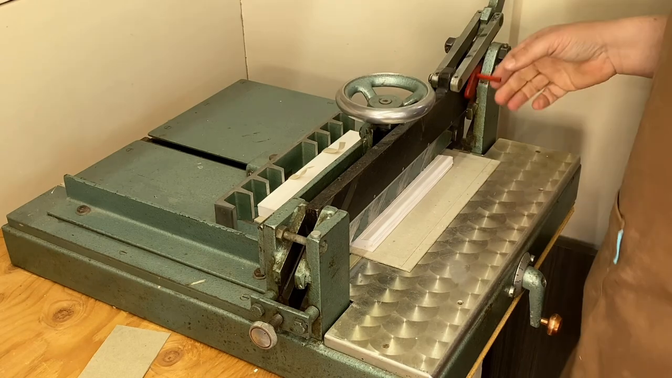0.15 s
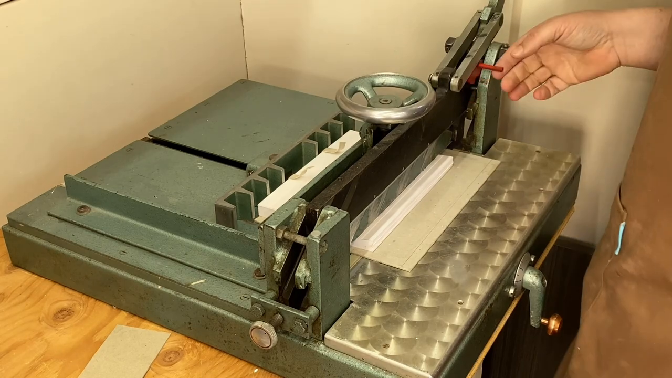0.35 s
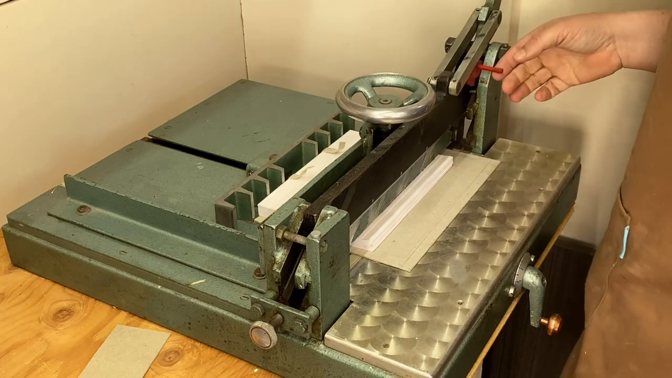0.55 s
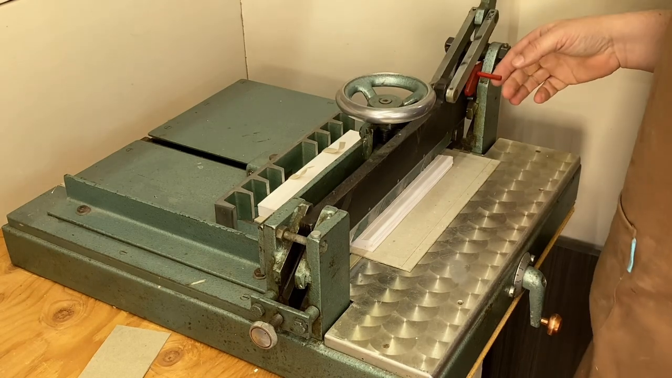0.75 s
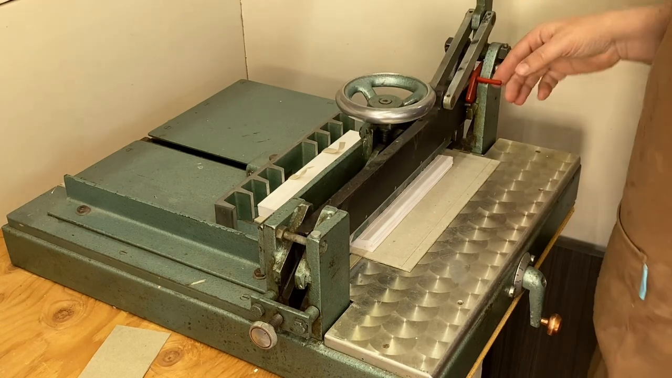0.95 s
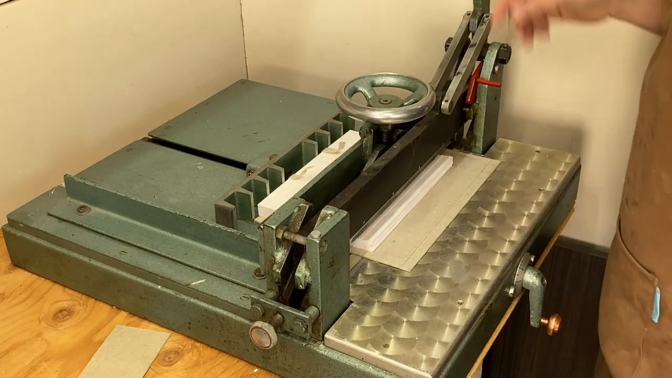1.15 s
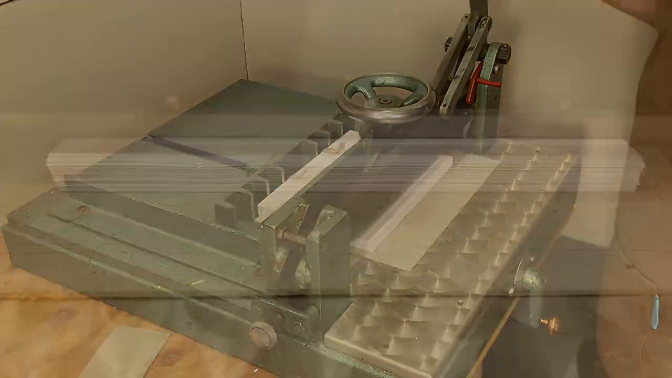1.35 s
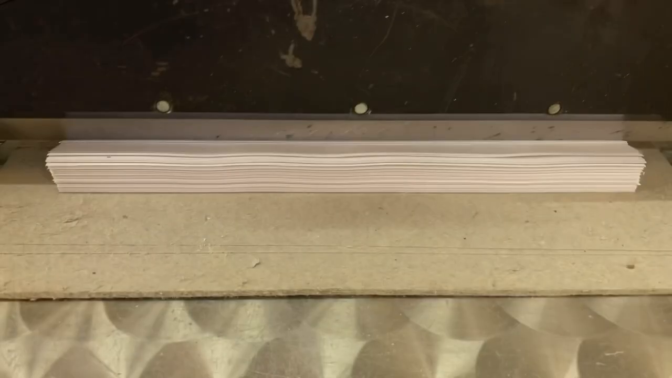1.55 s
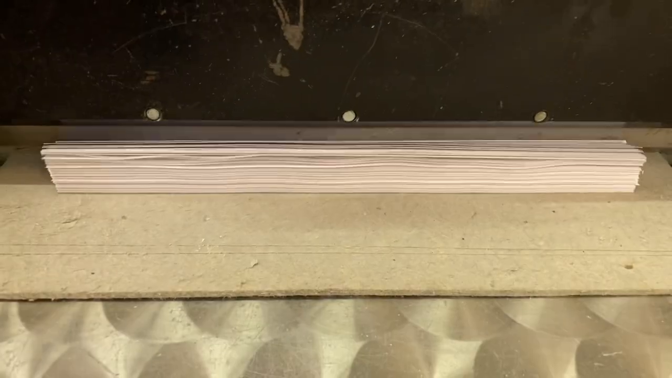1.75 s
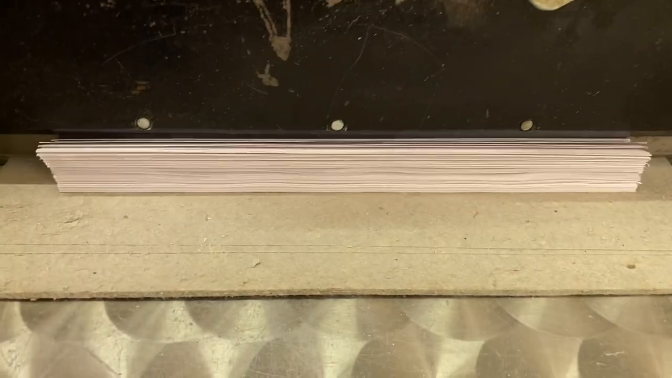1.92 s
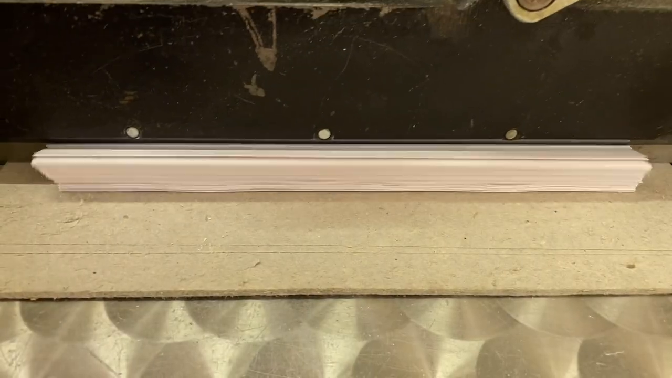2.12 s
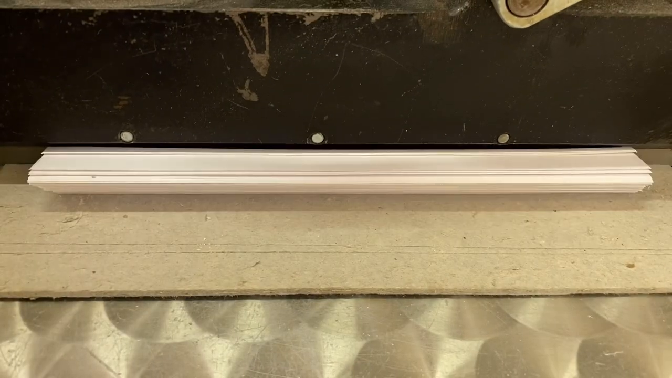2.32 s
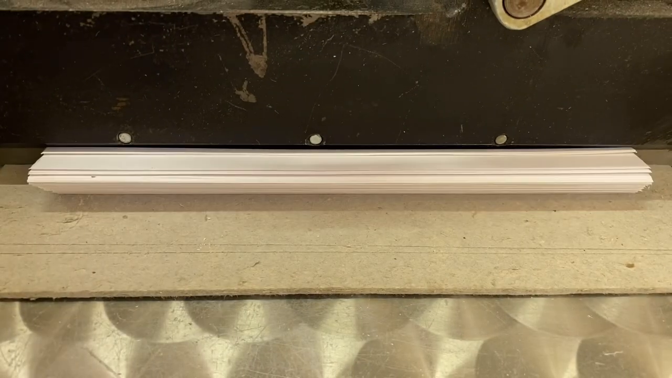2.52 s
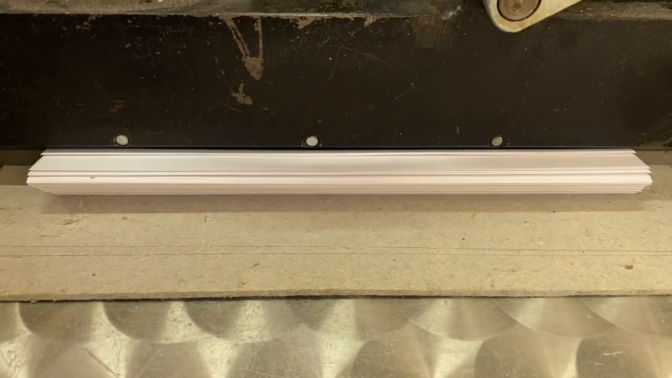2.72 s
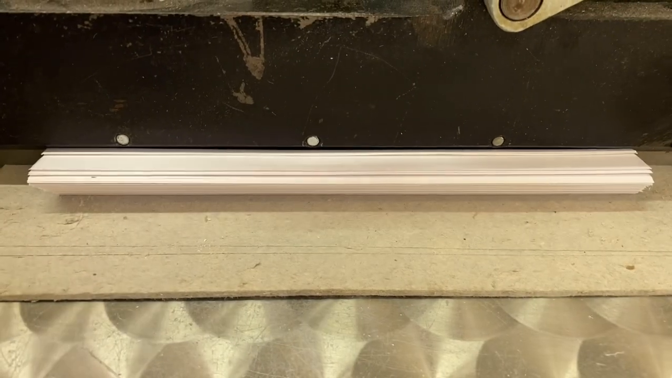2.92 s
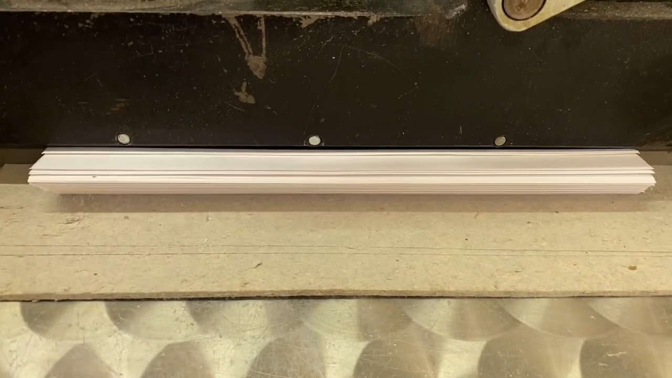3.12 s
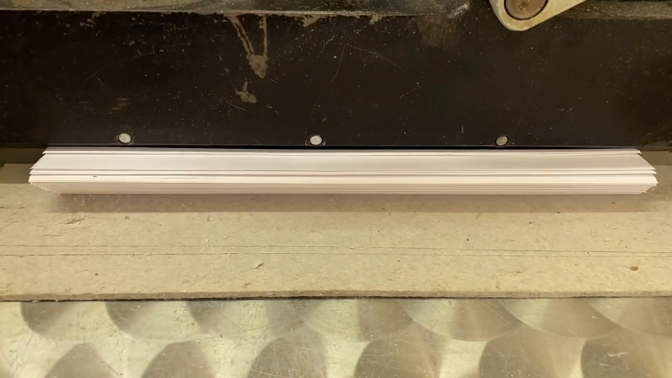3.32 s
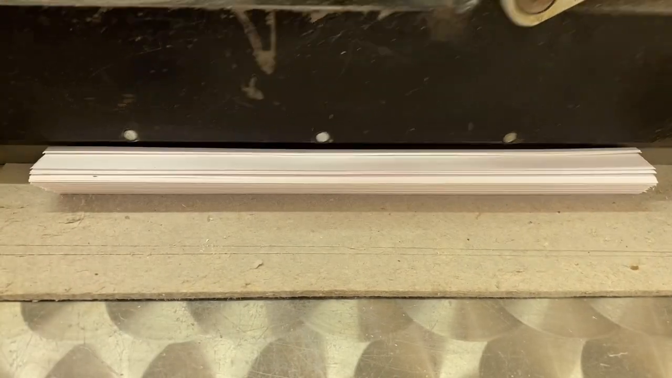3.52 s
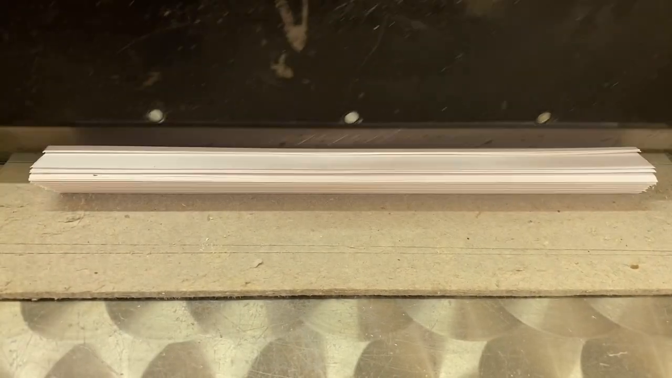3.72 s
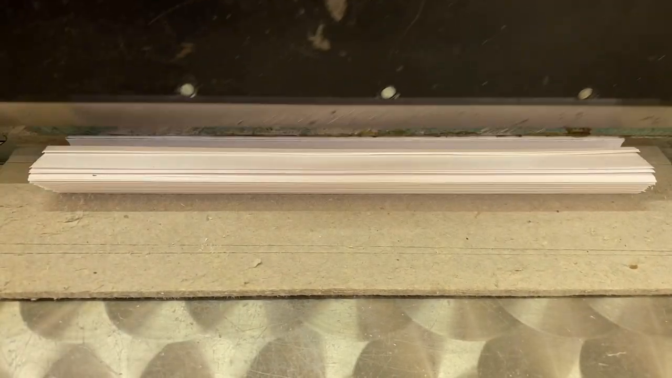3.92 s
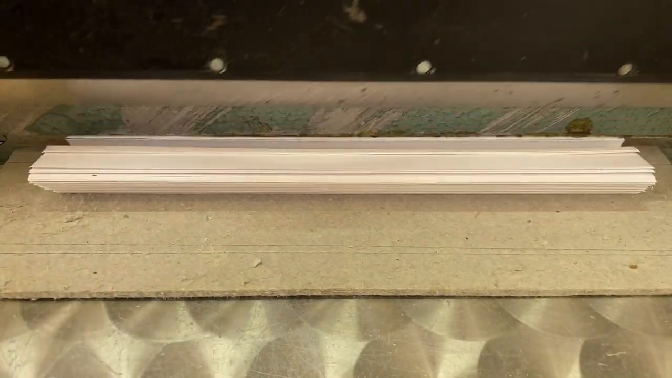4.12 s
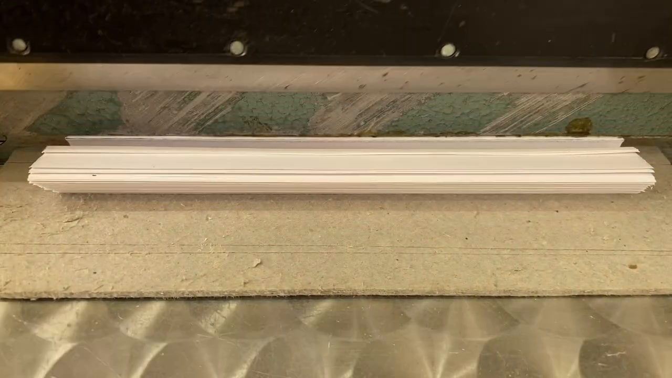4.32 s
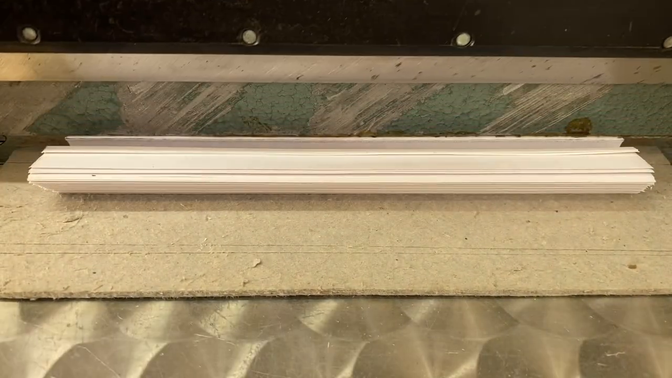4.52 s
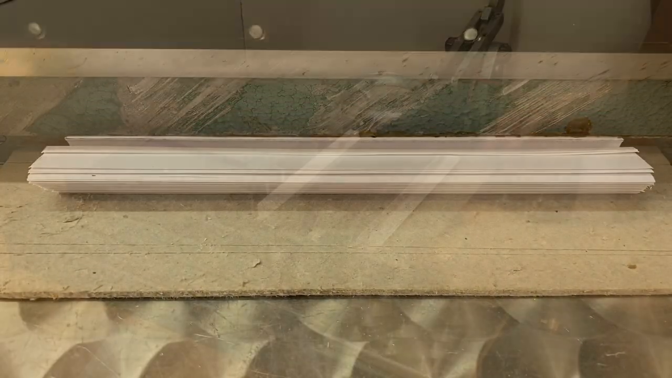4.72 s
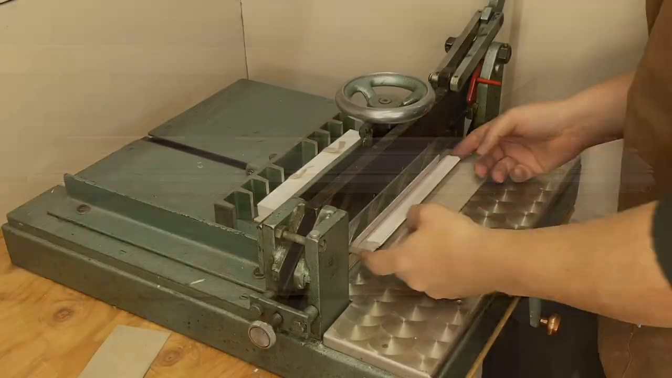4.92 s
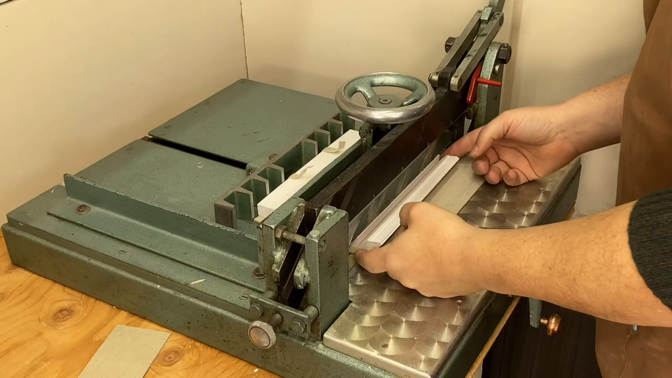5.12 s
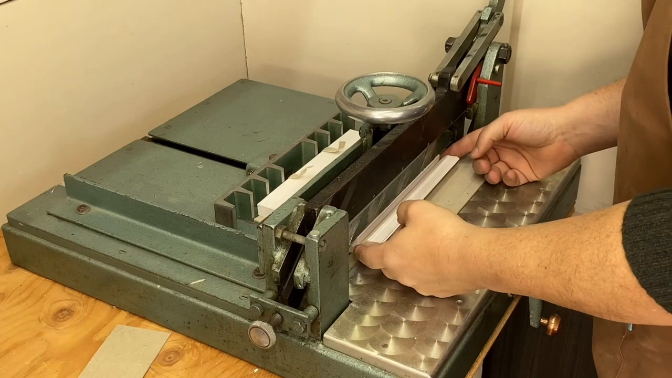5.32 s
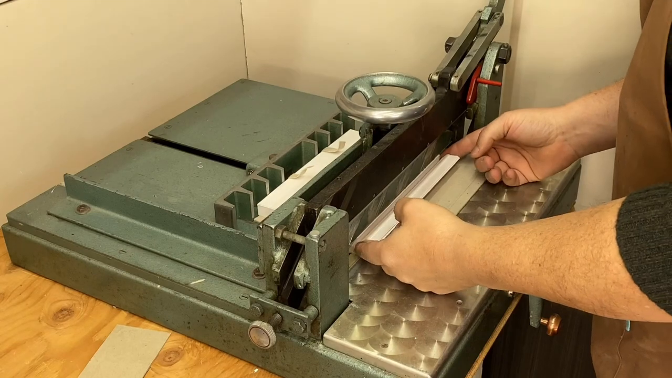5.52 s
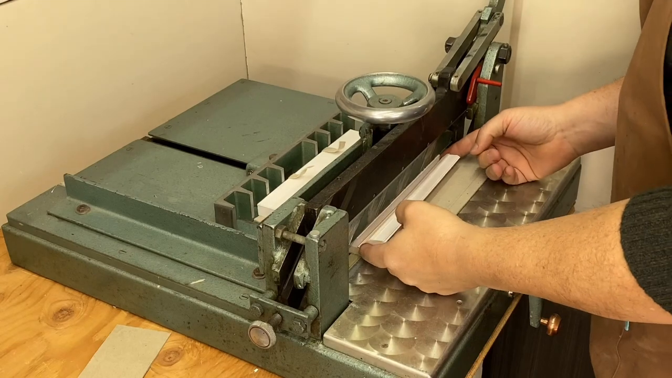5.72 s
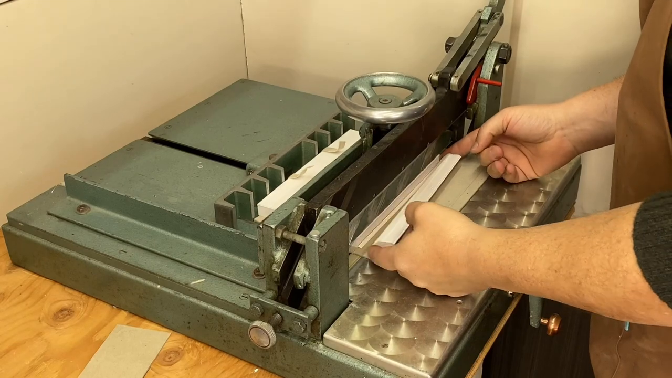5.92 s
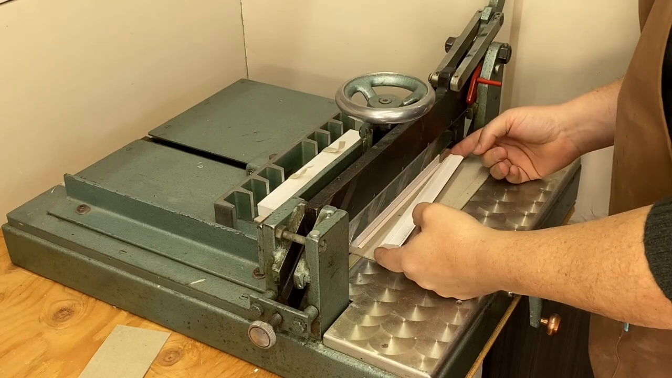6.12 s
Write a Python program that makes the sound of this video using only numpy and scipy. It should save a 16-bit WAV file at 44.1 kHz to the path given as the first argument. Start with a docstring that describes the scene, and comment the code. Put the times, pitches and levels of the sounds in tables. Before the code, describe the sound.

Metal lever knocks, a short groaning crunch of a blade cutting stacked paper, then sharp iron clunks in a small workshop.

```python
"""Cast-iron guillotine cutting a paper stack in a small workshop.
Catch and linkage knock, the carrier rubs in its guides, sheets part in turn with a groan and crunch.
The blade lands, rings and squeaks in the cutting stick; the lever hits its stop, the catch snaps shut,
hands slide the paper out. Blows ring the iron frame; the bench sways and shudders under the load."""
import sys
import numpy as np
from scipy import signal
from scipy.fft import rfft, irfft, next_fast_len
from scipy.io import wavfile
from scipy.ndimage import uniform_filter1d

SR = 44100
rng = np.random.default_rng(int(sys.argv[2]) if len(sys.argv) > 2 else 0)


def file_out(sig):
    """Save sig as 16-bit WAV at sys.argv[1]."""
    # one column per channel
    cols = np.atleast_2d(sig).T
    # limit, then scale
    lim = np.clip(cols, -1, 1)
    pcm = np.round(lim * 32767).astype(np.int16)
    wavfile.write(sys.argv[1], SR, pcm)


N = 271656
TIME_S = np.arange(N) / SR

# Workshop air spectrum: freq_hz, density_db
AIR_SPECTRUM = [(60, 15.5), (200, -7), (315, -0.5), (430, -4), (900, -10.5), (3300, -19.5), (7200, -22),
                (16000, -28)]
# Workshop decay: freq_hz, t60_s
ROOM_DECAY = [(100, 0.15), (400, 0.17), (1500, 0.2), (6500, 0.25), (15000, 0.22)]
# Load of lever and hands on the bench: time_s, level_db
BENCH_LOAD = [(0, -24.5), (.38, -14.5), (.65, -23.5), (1.1, -24), (1.38, -10.5), (1.53, -4), (1.8, -4),
              (2.03, 4), (2.28, -4), (2.41, -14.5), (2.76, 0.5), (2.95, -9), (3.3, -4.5), (3.72, 0.5),
              (4.05, -8.5), (4.3, -17), (5.1, -28.5), (6.15, -32.5)]
# Bench top spectrum: freq_hz, density_db
SHUDDER_SPECTRUM = [(32, 3), (48, -10), (70, -17.5), (119, -13), (200, -25), (260, -25.5), (400, -36.5),
                    (900, -67)]
# Catch, linkage and carrier knocks: start_s, contact_s, decay_s, level_db, thud_db, ring_hz, top_hz
JOINT_KNOCKS = [(0.033, 0.0004, 0.0011, -45.5, -2, 1450, 8200),
                (0.174, 0.0014, 0.0069, -47.5, 0, 3020, 4050),
                (0.205, 0.0017, 0.0014, -38.5, 1, 1950, 4120), (0.315, .003, 0.0073, -25, 20.5, 316, 4730),
                (0.638, .0043, 0.013, -48, -14, 905, 5000), (0.648, 0.0012, 0.005, -28, 9, 590, 6300),
                (0.919, 0.0031, 0.0039, -55, 6, 560, 1200), (0.992, 0.011, .013, -28.5, -8, 11300, 8000),
                (1.15, 0.0038, 0.0075, -40.5, 21, 560, 2210), (1.337, 0.0042, 0.0056, -31, 24.5, 120, 4000),
                (1.349, 0.0052, 0.0075, -24.5, 17.5, 1100, 6350),
                (1.352, .003, 0.011, -39, -23, 6000, 6200), (3.078, 0.0013, 0.0064, -25.5, 16.5, 120, 4660),
                (3.148, 0.00064, 0.0036, -39, 8.5, 120, 4360),
                (3.482, 0.0029, 0.0046, -32.5, 9.5, 200, 5800), (3.497, .001, .004, -34, -4, 5000, 11000),
                (3.724, 0.004, 0.0062, -37, 16.5, 520, 7000), (3.985, 0.0021, 0.0046, -41, -4, 3320, 6400),
                (4.085, 0.0067, .008, -48, 2, 276, 6000), (4.677, 0.0041, 0.0054, -47.5, -2, 400, 1220),
                (4.698, 0.0037, 0.011, -29, -14, 131, 14400)]
# Iron on iron: freq_hz, density_db
KNOCK_SPECTRUM = [(100, 1.5), (300, 0.5), (800, -7.5), (2000, -10), (6000, -15), (16000, -23)]
# Iron frame modes, relative to the blow's spectrum: freq_hz, gain_db, t60_s
IRON_MODES = [(124, 8.5, .2), (246.5, .5, .2), (279, 0, .1), (370, .5, .1), (419, 1, .075), (484, 4, .18),
              (684, -.5, .2), (810, 3, .14), (1094, -4.5, .14), (1238, 4, .11), (1500, 9, .075),
              (1730, -11, .2), (2133, -5.5, .17), (3963, -8, .14)]
# Carrier rub, downstroke: time_s, level_db
RUB_DOWN = [(1.4, -57.5), (2.15, -50.5), (2.39, -62), (2.56, -54.5), (2.68, -45), (2.86, -59.5), (3.2, -62)]
# Carrier rub, upstroke: time_s, level_db
RUB_UP = [(3.2, -65), (3.36, -52), (3.62, -48.5), (3.82, -56), (4.12, -54.5), (4.25, -65.5), (4.66, -68)]
# Guide friction: freq_hz, density_db
RUB_SPECTRUM = [(240, -54), (400, -5), (562, -10), (865, -7), (1820, -11), (2090, -11.5), (2320, -12),
                (7510, -18.5), (16000, -31)]
# Force on the edge: time_s, level_db
EDGE_FORCE = [(1.45, -26), (1.495, -7.5), (1.54, -13), (1.575, -5.5), (1.63, -7), (1.665, 2.5),
              (1.71, -0.5), (1.765, 2.5), (1.91, -1.5), (1.99, 0), (2.06, -3.5), (2.145, -5.5),
              (2.21, -24.5), (2.32, -29)]
# Cutting speed: time_s, sheets_per_s
CUT_RATE = [(1.47, 228), (1.52, 240), (1.575, 305), (1.61, 121), (1.69, 170), (1.76, 296), (1.87, 252),
            (1.93, 194), (2.2, 150)]
# Stack groan: freq_hz, density_db
GROAN_SPECTRUM = [(100, 10), (134, 10), (284, 4.5), (393, 3), (489, -14.5), (600, -11), (700, -44)]
# Paper fractures: freq_hz, density_db
CRUNCH_SPECTRUM = [(480, 8), (595, -11.5), (810, -7.5), (1140, -19), (1480, -18.5), (1740, -21.5),
                   (3000, -28.5)]
# Tearing fibres: freq_hz, density_db
FIBRE_SPECTRUM = [(2400, 4), (3000, -4), (5000, -5.5), (8400, -10), (11000, -16), (14800, -11),
                  (16000, -16)]
# Paper snapping under the edge and as strips fan out: start_s, level_db, decay_s
PAPER_SNAPS = [(1.472, -48.5, 0.003), (1.646, -37, 0.036), (1.788, -39.5, 0.0022), (1.82, -40, 0.0024),
               (1.934, -39, 0.0018), (2.117, -47, .003), (2.32, -50, 0.0085), (2.425, -55, 0.0033),
               (2.815, -53, 0.0022)]
# Snapping or sliding paper: freq_hz, density_db
PAPER_SPECTRUM = [(450, -3.5), (800, -5.5), (1100, -8.5), (1400, -9.5), (1800, -14.5), (4200, -16.5),
                  (8000, -22), (16000, -32.5)]
# Blade hitting the stick: freq_hz, density_db
LANDING_SPECTRUM = [(70, 10), (150, -2.5), (200, -11), (360, -6.5), (560, -23.5), (860, -11), (1100, -16),
                    (1510, -16), (3190, -21), (3910, -31), (4600, -22.5), (6500, -26), (8470, -48),
                    (9700, -46), (16000, -55)]
# Blade modes: freq_hz, level_db, t60_s
BLADE_RING = [(836, -25.5, 0.11), (1830, -60, 0.098), (3580, -33, 0.15), (3840, -54, 0.23),
              (3840, -33.5, 0.23), (3960, -30.5, .17), (4140, -31, 0.12), (4170, -42, 0.31),
              (6700, -42, 0.11), (9350, -58, 0.13), (9520, -60, 0.069), (9640, -49, 0.22),
              (9300, -32, 0.17), (13200, -51, 0.11)]
# Resonances of the edge in the stick: freq_hz, width_hz, level_db
SQUEAK_PEAKS = [(410, 194, 5.5), (1183, 60, 2.5), (1250, 26, -5), (1930, 64, -13), (5000, 640, -9.5)]
# Lever hitting its stop: freq_hz, density_db
STOP_SPECTRUM = [(80, -18), (122, -2), (170, -8), (250, -8), (420, -10), (620, -22.5), (800, -14.5),
                 (1550, -18.5), (2100, -21.5), (3900, -24), (4700, -29), (9500, -29.5), (12500, -50),
                 (16000, -43)]
# Catch shutting: freq_hz, density_db
CATCH_SPECTRUM = [(70, -0.5), (105, -17), (180, -22), (350, -16.5), (750, -27), (2600, -25), (3200, -55),
                  (3900, -56), (4800, -25), (8000, -30.5), (10000, -60), (12000, -34.5), (16000, -41)]
# Paper pushed over the table: start_s, attack_s, hold_s, level_db
PAPER_PUSHES = [(5.138, 0.008, 0.026, -50), (5.23, 0.013, 0.011, -53.5), (5.734, 0.14, 0.21, -58.5)]

CUTOFF_HZ = 16100


def from_db(db):
    """Decibels to gain."""
    return 10 ** (np.asarray(db) / 20)


def unit_rms(x):
    """Scale to rms 1."""
    return x / np.sqrt(np.mean(x ** 2) + 1e-20)


def curve(points, outside=None):
    """Table value at every sample."""
    return np.interp(TIME_S, *np.transpose(points), outside, outside)


def at_hz(points, hz):
    """Table value on a log-frequency axis."""
    freq_hz, value = np.transpose(points)
    return np.interp(np.log(np.maximum(hz, 1)), np.log(freq_hz), value)


def lowpass(x, hz):
    """Second-order low-pass."""
    return signal.sosfilt(signal.butter(2, hz, fs=SR, output="sos"), x)


def drift(rate_hz):
    """Smooth random wander, rms 1."""
    return unit_rms(lowpass(rng.standard_normal(N + SR), rate_hz)[SR:])


def coloured(x, spectrum):
    """Apply a spectrum, steep past its ends; rms 1."""
    size = next_fast_len(N)
    hz = np.maximum(np.arange(size // 2 + 1) * SR / size, 1)
    skirts = 1 / (1 + (spectrum[0][0] / hz) ** 8 + (hz / spectrum[-1][0]) ** 8)
    return unit_rms(irfft(rfft(x, size) * from_db(at_hz(spectrum, hz)) * skirts, size)[:N])


def grains(per_s, spread_db):
    """Random impulses of uneven size."""
    sizes = from_db(spread_db * np.minimum(rng.exponential(1, N), 4)) * rng.choice([-1, 1], N)
    return sizes * (rng.random(N) < per_s / SR)


def levelled(x, window_s):
    """Hold short-time rms at 1."""
    return x / np.sqrt(np.abs(uniform_filter1d(x ** 2, int(window_s * SR))) + 1e-9)


def swell(start_s, attack_s, hold_s, release_s):
    """Envelope: full at start_s, holds, decays."""
    before_s, after_s = np.maximum(start_s - TIME_S, 0), np.maximum(TIME_S - start_s - hold_s, 0)
    return np.exp(-before_s / (attack_s + 1e-4) - after_s / (release_s + 1e-4))


def resonance(x, hz, width_hz):
    """Steep-sided peak, rms 1."""
    for span_hz in (width_hz, 2 * width_hz):
        x = signal.lfilter(*signal.iirpeak(hz, hz / span_hz, fs=SR), x)
    return unit_rms(x)


def add(out, start_s, sound):
    """Mix in at start_s."""
    i = int(start_s * SR)
    out[i:i + len(sound)] += sound[:N - i]


def room_air(level_db=-58.5):
    """Steady workshop noise."""
    return from_db(level_db) * coloured(rng.standard_normal(N), AIR_SPECTRUM)


def bench(blows, sway_hz=26.5, jolt_decay_s=0.057):
    """The bench sways at its lowest resonance; its top shudders with load and after blows."""
    load_db = curve(BENCH_LOAD)
    cycles = np.cumsum(sway_hz * (1 + .14 * drift(14))) / SR
    uneven_db = 2.8 * np.clip(drift(8), -2, 1)
    sway = np.sqrt(2) * np.sin(2 * np.pi * cycles) * from_db(-13.5 + load_db + uneven_db)
    pole = np.exp(-1 / (jolt_decay_s * SR))
    bass_power = signal.lfilter([1 - pole], [1, -pole], lowpass(blows, 130) ** 2 + 1e-18)
    jolt = from_db(-5) * np.sqrt(bass_power)
    shudder = np.hypot(from_db(-36 + 0.7 * load_db), jolt)
    return sway + shudder * levelled(coloured(rng.standard_normal(N), SHUDDER_SPECTRUM), 0.27)


def ring(modes, attack_s, rattle_hz=0):
    """Decaying modes of a struck part; rattle in its holder widens each to rattle_hz."""
    t = TIME_S[:SR // 2]
    walks = np.cumsum(rng.standard_normal((len(modes), len(t))), axis=1)
    blur_cycles = walks * np.sqrt(rattle_hz / (2 * np.pi * SR))
    tones = sum(from_db(db - 60 * t / t60_s) * np.sin(2 * np.pi * (hz * t + rng.random() + blur))
                for (hz, db, t60_s), blur in zip(modes, blur_cycles))
    return tones * (1 - np.exp(-t / attack_s))


def blow(spectrum, contact_s, decay_s, room_db, ripple_db=4.5, crack=2.7, crack_s=0.00025):
    """Blow on the casting: crack, fast-dying dense modes, room tail, frame ring. Rms 1 over 50 ms."""
    t, first_50ms = TIME_S[:int(.45 * SR)], slice(SR // 20)
    edges_hz = np.geomspace(75, 17000, 25)
    # each contact point favours its own modes
    white = rfft(rng.standard_normal((2, len(t))))
    ripple = unit_rms(uniform_filter1d(uniform_filter1d(rng.standard_normal(white.shape), 48), 48))
    noise = irfft(white * from_db(ripple_db * np.clip(ripple, -2, 2)), len(t))
    out = 0
    for k, (low_hz, high_hz) in enumerate(zip(edges_hz, edges_hz[1:])):
        hz = np.sqrt(low_hz * high_hz)
        bandpass = signal.butter(2, [low_hz, high_hz], "band", fs=SR, output="sos")
        band = signal.sosfilt(bandpass, noise[k % 2])[::-1]
        after_s = np.maximum(t - contact_s - 2.8 / hz, 0)
        direct_power = np.exp(-after_s / (decay_s + 1e-4))
        room_power = from_db(room_db - 60 * after_s / at_hz(ROOM_DECAY, hz)) ** 2
        # bands build over 6 cycles; the crack peaks mid-contact
        rise = (1 - np.exp(-t * hz / 6)) * np.minimum(0.59 + 0.37 * t / (contact_s + 1e-4), 1)
        spike = 1 + crack * np.exp(-np.abs(t - contact_s / 2) / crack_s)
        band = levelled(band, 0.018 + 4 / hz) * rise * spike * np.sqrt(direct_power + room_power)
        gain = from_db(at_hz(spectrum, hz)) * np.sqrt(high_hz - low_hz)
        out += gain * band / np.std(band[first_50ms])
    frame = [(hz, db + at_hz(spectrum, hz) + 10 * np.log10(hz), t60_s) for hz, db, t60_s in IRON_MODES]
    out += ring(frame, attack_s=0.0084 + contact_s / 2)[:len(t)]
    return out / np.std(out[first_50ms])


def knocks(thud_below_hz=463, ring_db=8, ring_octaves=0.71):
    """Joints take up play: each part rings, heavy ones thud, soft contacts lose treble."""
    out, hz = np.zeros(N), np.geomspace(85, CUTOFF_HZ, 60)
    for start_s, contact_s, decay_s, level_db, thud_db, ring_hz, top_hz in JOINT_KNOCKS:
        bass_db = thud_db / (1 + (hz / thud_below_hz) ** 3)
        part_db = ring_db * np.exp(-(np.log2(hz / ring_hz) / ring_octaves) ** 2)
        loss_db = 10 * np.log10(1 + (hz / top_hz) ** 6)
        spectrum = list(zip(hz, at_hz(KNOCK_SPECTRUM, hz) + bass_db + part_db - loss_db))
        add(out, start_s, from_db(level_db) * blow(spectrum, contact_s, decay_s, room_db=-9.5))
    return out


def through_frame(x, ringing, q=22):
    """Direct sound plus the frame's resonances; rms 1."""
    modes = sum(signal.lfilter(*signal.iirpeak(hz, q, fs=SR), x) for hz, _, _ in IRON_MODES)
    return unit_rms(x + ringing * modes)


def guide_rub():
    """The blade carrier hisses in its guides, down then up."""
    envelope = sum(from_db(curve(stroke, outside=-120)) for stroke in (RUB_DOWN, RUB_UP))
    return envelope * through_frame(coloured(grains(12000, 0.63), RUB_SPECTRUM), ringing=0.17)


def cut(bite_s=1.645):
    """Sheets part in turn, so groan pitch follows blade speed; fibres crunch and tear above it."""
    force_db = curve(EDGE_FORCE, outside=-120)
    loose_db = -3.5 * (TIME_S < bite_s)   # loose top sheets crunch less
    sheets = np.cumsum(curve(CUT_RATE) * (1 + .1 * drift(45))) / SR
    partings = np.diff(np.floor(sheets), prepend=0) * from_db(4 * drift(120))
    pulses = levelled(coloured(partings, GROAN_SPECTRUM), 0.0456)
    buckling = levelled(coloured(grains(1500, 3.7), GROAN_SPECTRUM), 0.046)
    snag_db = 1.5 * drift(34)   # the edge catches and frees itself
    surge_db = 2 * drift(17)
    groan = from_db(-22 + force_db + snag_db / 2 + surge_db) * (.9 * pulses + .45 * buckling)
    per_sheet = 1 + .5 * np.cos(2 * np.pi * sheets)
    fractures = coloured(grains(2200, 3) * per_sheet, CRUNCH_SPECTRUM)
    crunch = from_db(-32 + 0.86 * force_db + loose_db + snag_db) * through_frame(fractures, ringing=0.9)
    # the edge grazes the top sheet
    graze = from_db(-43) * swell(1.5, attack_s=0.0083, hold_s=0.0091, release_s=0.014)
    tearing = from_db(-46.5 + 0.99 * force_db + loose_db + snag_db / 2)
    fibres = coloured(grains(12000, 0.47) * per_sheet, FIBRE_SPECTRUM)
    return groan + crunch + (graze + tearing) * fibres


def snaps():
    """Bunches of sheets give way and the offcut springs loose: short cracks."""
    out = np.zeros(N)
    for start_s, level_db, decay_s in PAPER_SNAPS:
        snap = blow(PAPER_SPECTRUM, contact_s=0.00093, decay_s=decay_s, room_db=-9)
        add(out, start_s, from_db(level_db) * snap)
    return out


def clunks(landing_s=2.589, stop_s=3.5025, catch_s=4.8852):
    """The blade lands and rings, the lever hits its stop, the catch shuts."""
    out = np.zeros(N)
    landing = blow(LANDING_SPECTRUM, contact_s=0.0031, decay_s=0.0029, room_db=-8, crack=1, crack_s=0.0037)
    add(out, landing_s, from_db(-16) * landing)
    add(out, landing_s, from_db(7.5) * ring(BLADE_RING, attack_s=0.00063, rattle_hz=30))
    stop = blow(STOP_SPECTRUM, contact_s=0.0022, decay_s=0.0068, room_db=-9.5,
                ripple_db=6.5, crack=.4, crack_s=.002)
    add(out, stop_s, from_db(-16) * stop)
    catch = blow(CATCH_SPECTRUM, contact_s=.0006, decay_s=.0073, room_db=-5.5, crack=3.7, crack_s=.0019)
    add(out, catch_s, from_db(-30) * catch)
    return out


def squeak(start_s=2.665, sag_db_per_s=66):
    """The edge slips in the cutting stick, exciting narrow resonances."""
    slips = grains(2000, 1.6)
    tone = sum(from_db(db) * resonance(slips, hz, width_hz) for hz, width_hz, db in SQUEAK_PEAKS)
    pressure = swell(start_s, attack_s=.008, hold_s=0.17, release_s=0.014)
    level_db = -35 - sag_db_per_s * np.maximum(TIME_S - start_s, 0)
    return from_db(level_db) * pressure * levelled(tone, 0.021)


def paper_slide():
    """Pushed paper rubs on the table and rings the frame."""
    envelope = sum(from_db(db) * swell(start_s, attack_s, hold_s, release_s=0.019)
                   for start_s, attack_s, hold_s, db in PAPER_PUSHES)
    return envelope * through_frame(coloured(grains(5000, 1.9), PAPER_SPECTRUM), ringing=0.36)


def scene():
    """Machine, air, paper and bench; mono."""
    blows = knocks() + clunks()
    mix = blows + room_air() + cut() + snaps() + guide_rub() + squeak() + paper_slide() + bench(blows)
    return mix[None]


def record(dry):
    """Soft clip, steep low-pass."""
    rounded = 1.328 * np.tanh(dry / 1.281)
    return signal.sosfilt(signal.ellip(10, .2, 80, CUTOFF_HZ, fs=SR, output="sos"), rounded)


dry = scene()
out = record(dry)
file_out(out)
```